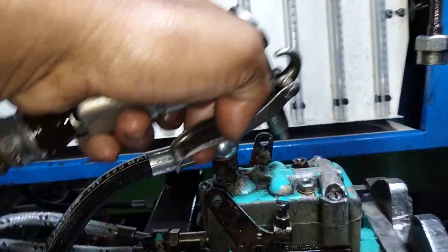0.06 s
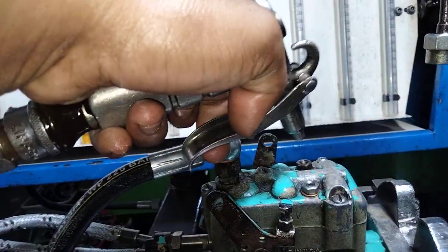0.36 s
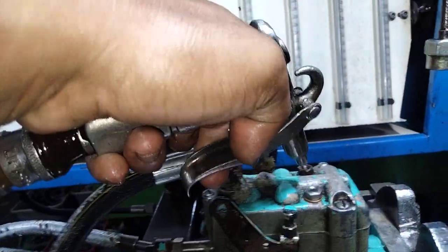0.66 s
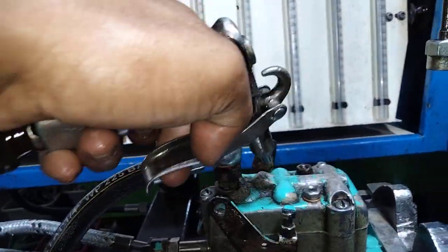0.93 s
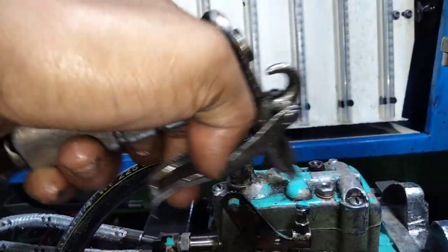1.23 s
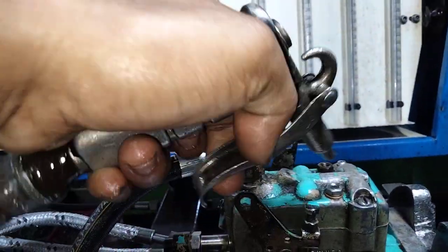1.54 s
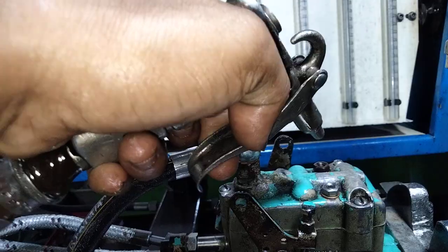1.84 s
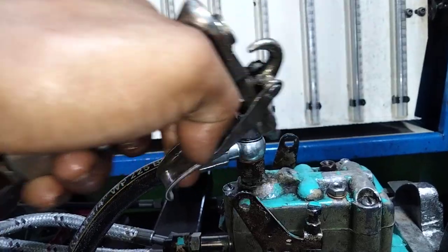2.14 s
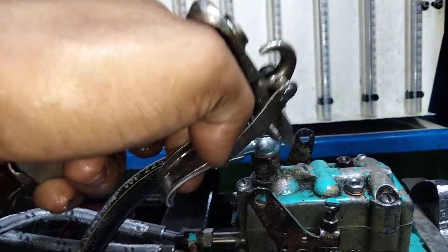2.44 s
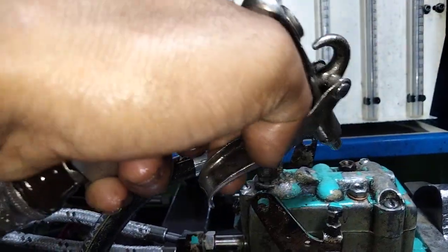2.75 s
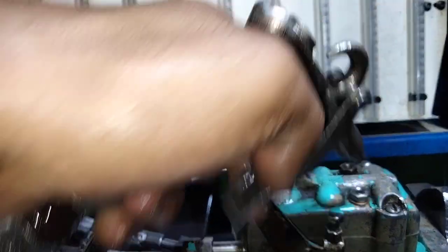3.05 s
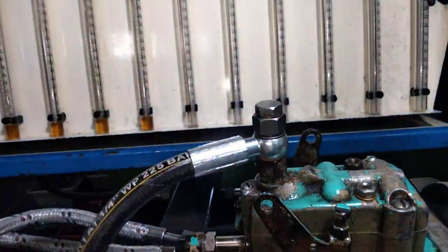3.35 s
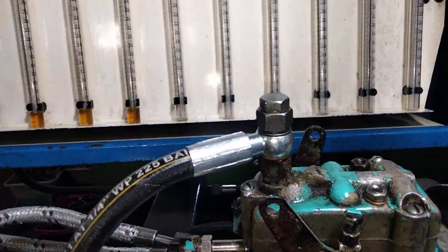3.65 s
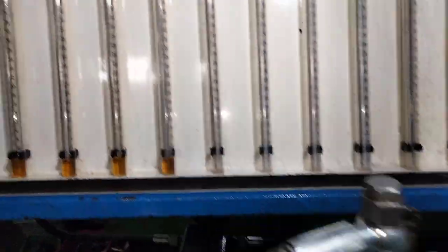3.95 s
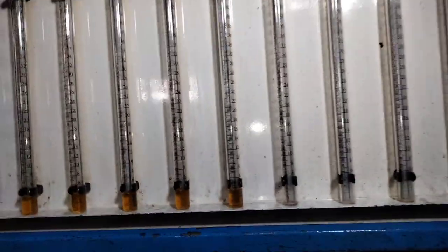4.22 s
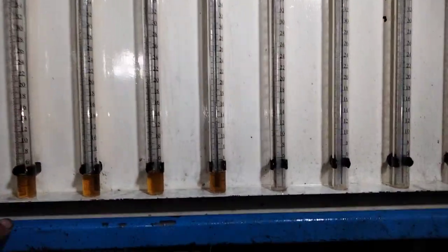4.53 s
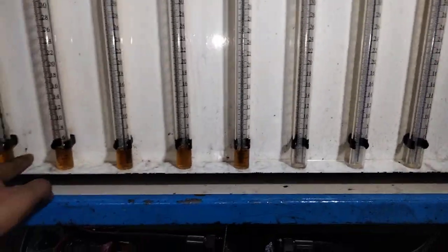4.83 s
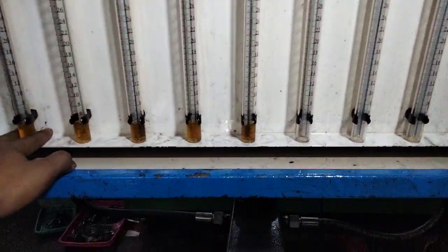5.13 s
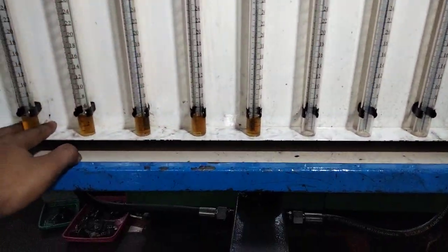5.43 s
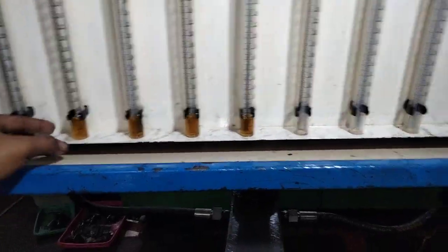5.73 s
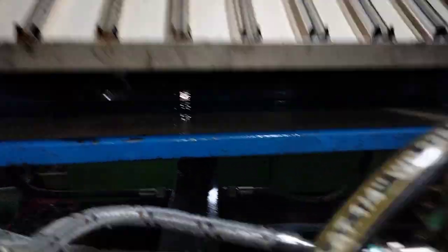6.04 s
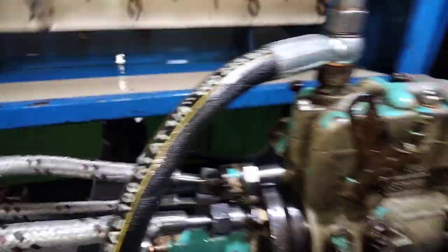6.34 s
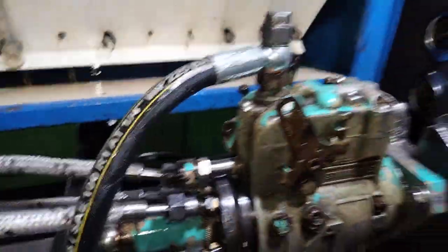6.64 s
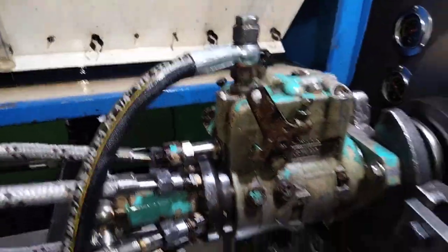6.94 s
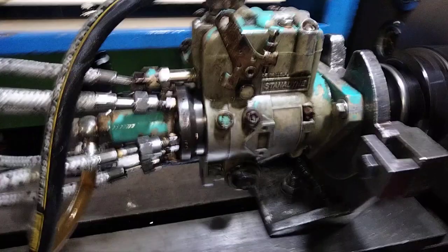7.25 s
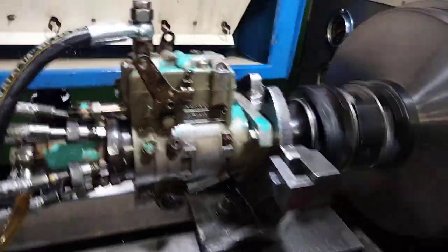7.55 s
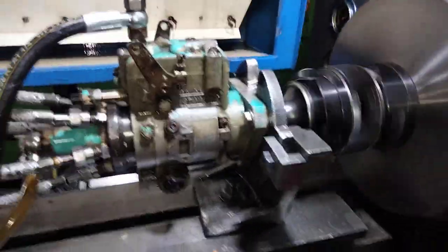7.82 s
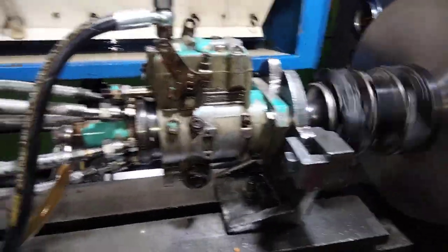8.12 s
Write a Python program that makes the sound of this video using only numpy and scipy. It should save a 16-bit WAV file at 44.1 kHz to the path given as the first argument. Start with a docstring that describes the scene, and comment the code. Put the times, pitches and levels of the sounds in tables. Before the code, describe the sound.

Close to the microphone in a workshop, a blow gun blasts compressed air for about three seconds, with one short pause, and dies in a wet sputter. A diesel injection pump running on a test bench comes forward, with rapid, uneven ticks, pipe pings and low knocks over a faint motor hum. A few tool clacks, a short whistling squirt and a metal clink follow, and the clatter changes tone near the end.

```python
"""In a workshop, a six-line diesel injection pump turns slowly on a test bench, close to a phone.
Each turn gives six uneven injector ticks, pings in the pipes, knocks in the pump and thuds in the frame.
For three seconds a blow gun blasts air over the pump, with one short pause, and dies in a wet sputter.
Later come a whistling squirt, tool knocks, a clinking lever and a droning panel. A motor hums below,
and the tone shifts as the phone moves from the bench's glass tubes to its drive."""
import sys
import numpy as np
from scipy import signal
from scipy.fft import rfft, irfft, next_fast_len
from scipy.io import wavfile
from scipy.ndimage import uniform_filter1d

SR = 44100
rng = np.random.default_rng(int(sys.argv[2]) if len(sys.argv) > 2 else 0)


def inscribe(sig):
    """Save sig as 16-bit PCM at rate SR to the path in sys.argv[1].

    A 1-D sig is mono; a 2-D sig holds one channel per row.
    Samples are clipped to [-1, 1] before scaling.
    """
    pcm = np.round(np.clip(np.atleast_2d(sig).T, -1, 1) * 32767)
    wavfile.write(sys.argv[1], SR, pcm.astype(np.int16))


N = 369558
T = np.arange(N) / SR

# how far the drive shaft has turned: (time [s], count [turns])
SHAFT_TURNS = [(0, 0.382), (3.6837, 22), (4.707, 28), (6.0686, 36), (6.5805, 39), (7.4346, 44),
               (8.4569, 50)]
# the six ticks of a turn, two of them double:
# (time in turn [s], chatter [dB], rise [s], decay [s], snap [dB], body knock [dB], pipe ring [dB])
STROKES = [(.0035, 0, 0.0044, 0.0063, -1.5, -4, 0.5), (0.0316, -2.5, 0.0045, 0.0087, -4.5, -3, -5.5),
           (0.0574, -6.5, 0.0018, 0.01, -4.5, -4.5, -10), (0.086, -6.5, 0.0024, 0.0068, -7.5, -4, -31),
           (0.0915, -4.5, 0.0019, 0.0076, -27, -4.5, -14.5), (0.1141, -2.5, .002, .005, -10.5, -1, -14),
           (0.142, -4.5, 0.0015, 0.0067, -4.5, -1, -10), (0.149, -2, 0.0017, 0.0034, -30, -2.5, -16)]
# tone of a tick's gritty chatter: (frequency [Hz], level [dB])
TICK_TONE = [(900, -18.5), (2000, -16), (3500, -10.5), (5000, -12.5), (7000, -11.5), (8200, -2), (9200, 4),
             (10500, -7.5), (13300, -14.5), (15300, -17.5)]
# tone of its bright snap: (frequency [Hz], level [dB])
SNAP_TONE = [(1500, -37), (3500, -20), (7000, -8.5), (9300, 4), (11000, -2.5), (13300, -8), (15300, -1)]
# tone of the injector nozzles ringing on: (frequency [Hz], level [dB])
RING_TONE = [(900, -25), (2800, -9), (6500, -15), (8200, 2), (9200, 8), (10500, -9), (13000, -23),
             (15300, -24)]
# loudness of the injector clatter: (time [s], level [dB])
CLATTER_LEVEL = [(3.9, -32), (5.9, -33), (6.5, -32), (7.25, -32), (7.65, -36.5)]
# tone of the pump body by the tubes: (frequency [Hz], level [dB])
BODY_BY_TUBES = [(35, -17), (70, -1), (130, 4), (220, 5), (320, -1), (420, -1.5), (700, -3), (950, -3),
                 (1170, -12), (1420, -7), (2200, -5.5), (5000, -10.5)]
# the same by the drive: (frequency [Hz], level [dB])
BODY_BY_DRIVE = [(35, -16), (70, -0.5), (130, -2.5), (220, 8), (340, -3), (440, 2.5), (580, -2), (780, -4),
                 (960, -14), (1100, -14.5), (2200, -14), (5000, -36)]
# notes of the housing and bench panel: (pitch [Hz], width [Hz], boost by tubes [dB], boost by drive [dB])
HOUSING_NOTES = [(987, 43.8, 2.5, 10), (1377, 71, 8.5, 6), (1820, 57, 0, 11.5)]
# notes of the steel pipes: (pitch [Hz], level by tubes [dB], level by drive [dB], time to fade 60 dB [s])
PIPE_NOTES = [(2543, 2, -21, 0.053), (2768, 4, -4, 0.088), (2970, -5, -14, 0.085), (3520, -6, 0, 0.07),
              (4130, -12, -14, 0.056), (5730, -40, -15, 0.051)]
# twisting jolts that shake the frame: (time in turn [s], level [dB])
JOLTS = [(0.014, -35), (.022, 5), (0.046, -12), (0.078, -17), (.113, -11), (0.14, 2.5), (0.146, -7)]
# how near the phone is to the pump, as loudness: (time [s], relative level [dB])
NEARNESS = [(4.0, -29.5), (4.22, -27.5), (4.7, -29.5), (5.42, -27.5), (5.9, -28.0), (6.3, -31.5),
            (6.58, -32.0), (7.0, -30), (7.6, -29.5), (8.15, -29.5)]
# where the phone is: (time [s], place [0 by the tubes, 1 by the drive])
PHONE_PLACE = [(5.9, 0.1), (6.4, 0.4), (7.2, 0.4), (7.5, 0.97)]
# brief dips in the machine's sound: (start [s], hold [s], depth [dB])
DIPS = [(2.279, 0.052, -6), (3.214, .06, -4), (3.43, 0.22, -5), (3.805, 0.071, -4.5), (4.942, 0.071, -15)]
# trigger pulls: (opens [s], shuts [s], hiss [dB], roar [dB], buffeting [dB], leak afterwards [dB])
BLASTS = [(-.05, 2.265, -19, -22, -27, -28.5), (2.384, 2.478, -23, -26.5, -33.5, -50),
          (2.477, 3.203, -18.5, -22, -26, -23.5)]
# tone of the air jet: (frequency [Hz], level [dB])
JET_TONE = [(15, -30), (25, 1), (165, 0.5), (219, -1), (297, 0.5), (694, 0), (1780, -1.5), (5280, -8.5),
            (7000, -13), (9100, -42), (15400, -120)]
# tone of the nozzle's hiss: (frequency [Hz], level [dB])
HISS_TONE = [(4000, -41), (6500, -15), (7600, -11), (8400, -3.5), (9100, -1), (9700, -3), (10400, -6.5),
             (11200, -7.5), (12300, -11), (13400, -13), (14500, -11.5), (15200, -7.5), (15600, -13)]
# how squarely the nozzle faces the phone: (time [s], relative hiss [dB])
GUN_AIM = [(0.0, -18), (0.69, -17.5), (0.71, -19.5), (1.35, -19), (1.37, -20), (1.61, -18), (1.86, -22.5),
           (2.05, -21), (2.14, -18.5), (2.24, -22), (2.51, -18.5), (2.618, -21.5), (2.836, -18.5),
           (3.038, -22.5), (3.18, -20)]
# air glancing off the pump onto the phone: (time [s], extra buffeting [dB])
AIR_SPILL = [(.4, 2), (1.2, -0.5), (1.68, 0.5), (1.74, 3.5), (2.25, 2.5), (2.5, 0.5), (3.12, 2), (3.19, 0)]
# the jet grazes an edge: (start [s], hold [s], level [dB], rise [s], decay [s])
GRAZES = [(.15, 0.055, -28, .11, 0.11), (1.17, 0.11, -28, 0.29, .1)]
# the thin whistle at that edge: (pitch [Hz], width [Hz], level [dB])
EDGE_NOTE = [(11750, 400, 0)]
# air fizzing through oil: (start [s], hold [s], level [dB], rise [s], decay [s])
FIZZES = [(3.329, 0.012, -21, 0.026, 0.023), (3.465, 0.093, -19, 0.056, 0.09)]
# tone of the fizz: (frequency [Hz], level [dB])
FIZZ_TONE = [(120, -5.5), (350, -1), (800, -13), (1500, -11), (2100, -13), (4200, -4.5), (6000, -9),
             (7500, -3.5), (9000, 0.5), (11000, -8.5), (13500, -11), (15300, -11)]
# notes in the fizz: (pitch [Hz], width [Hz], level [dB])
FIZZ_NOTES = [(2050, 50, -3), (2430, 22, -3.5), (2700, 70, -2), (3030, 90, -4), (3500, 59, -4),
              (3760, 65, -5), (4180, 89, -1), (4680, 80, -2.5)]
# notes of the whistling squirt: (pitch [Hz], width [Hz], level [dB])
SQUIRT_NOTES = [(3440, 1000, 0.5), (7000, 130, -2.5), (10820, 25, -4), (8800, 1700, -2)]
# tool and hand knocks: (time [s], clack [dB], clank [dB], thud [dB], decay [s])
KNOCKS = [(2.376, -18, -46, -42, .0015), (2.385, -16, -36, -35, .005), (3.315, -24, -45, -38, 0.0027),
          (3.335, -29, -42, -23.5, 0.012), (3.356, -29, -32, -32, .003), (3.52, -40, -32, -30.5, 0.062),
          (3.786, -15.5, -15.5, -43, .007), (3.804, -23, -22, -50, 0.021),
          (4.941, -16, -19.5, -19.5, 0.0031), (6.016, -25, -28, -25, 0.021), (7.439, -25, -23, -45, .007)]
# slow swings of air pressure at the phone: (start [s], level [dB], length [s])
PUFFS = [(2.237, -26.5, 0.075), (3.18, -31, 0.1), (3.363, -31, 0.13), (4.93, -40, 0.074)]
# notes of the steel lever: (pitch [Hz], width [Hz], level [dB])
LEVER_NOTES = [(2480, 330, -10), (4160, 300, -8), (5100, 350, -4.5), (7300, 250, -7), (9360, 350, 3.5),
               (10300, 250, -4), (11800, 600, -5)]
# notes of the loose panel: (pitch [Hz], width [Hz], level [dB])
PANEL_NOTES = [(420, 43, -1), (644, 15, -3.5), (950, 140, -3), (2520, 250, -6)]
# notes of the motor: (pitch [Hz], level by tubes [dB], level by drive [dB])
HUM_NOTES = [(70.4, -47, -62), (385.7, -44, -60), (424.4, -56, -48), (452, -47.5, -52), (498.5, -49, -56),
             (534, -54, -42.5)]
# tone of the workshop's steady noise: (frequency [Hz], level [dB])
ROOM_TONE = [(25, -16), (70, -13.5), (200, -5.5), (450, -2.5), (1000, -7), (2500, -14), (6500, -9.5),
             (9050, -10), (11000, -11), (13000, -24), (15300, -25)]

TURN_S = 6 / 35.21  # six ticks a turn, about 35 ticks a second
TICK_FOLLOW, RATTLE_FOLLOW, BODY_FOLLOW = 0.27, 1.7, 1.15  # dB gained per dB of nearness
ROAR_FOLLOW, ROAR_LOSS = 0.65, 0.64  # dB of roar gained per dB of aim, and lost per dB of spill


def pump(tick_db=-26.5, body_db=-37, rattle_db=-33, pipe_db=-6, frame_db=-39.5, accent_db=2):
    """Ticks, pings, knocks and thuds add up; their balance shifts as the phone moves."""
    near = around_average(NEARNESS)
    # by the drive, the first tick of each turn stands out
    first_tick = each_turn(turn_pulse(STROKES[0][0], 0, rise=0.0083, decay=0.0064))
    clatter, tick = split(injectors() * amp(by_place(0, accent_db) * first_tick), 6070)
    knock, rattle = split(pump_body(), 860)
    out = amp(tick_db + TICK_FOLLOW * near) * unit_level(tick)
    out += amp(curve(CLATTER_LEVEL)) * (unit_level(clatter) + amp(pipe_db) * pipes())
    out += amp(rattle_db + RATTLE_FOLLOW * near) * unit_level(rattle)
    out += amp(BODY_FOLLOW * near) * (amp(body_db) * unit_level(knock) + amp(frame_db) * frame())
    return out


def injectors(tail_db=-17, grit_db=1.5, uneven_db=1.0):
    """Each injector snaps open, chatters in a gritty burst and rings on faintly."""
    burst = combine(turn_pulse(s, db, rise, decay) for s, db, rise, decay, *_ in STROKES)
    tail = combine(turn_pulse(s, db + tail_db, rise, decay=0.036) for s, db, rise, *_ in STROKES)
    crack = sum(turn_pulse(s, db, rise=0.00028, decay=0.0034) for s, *_, db, _, _ in STROKES)
    chatter = colour(noise() * each_turn(burst) * amp(grit_db * drift(1500)), TICK_TONE)
    snaps = colour(noise() * each_turn(crack), SNAP_TONE)
    ringing = colour(noise() * each_turn(tail), RING_TONE)
    return unit_level((chatter + snaps + ringing) * amp(uneven_db * drift(50)))


def pump_body(rumble=0.59, alike_below_hz=1800):
    """The cam and plungers knock alike in every turn; only the rattle on top changes."""
    pushes = combine(turn_pulse(s, db, rise=0.002, decay=0.018) for s, *_, db, _ in STROKES)
    force = np.hypot(pushes, rumble)
    knocks = rng.standard_normal(len(force))
    for _ in range(3):  # sharp knocks are about equally strong at every pitch
        phases = np.angle(rfft(knocks * force))
        knocks = irfft(np.exp(1j * phases), len(force))
    low_rattle, high_rattle = split(unit_level(noise() * each_turn(force)), alike_below_hz)
    low_knocks, _ = split(unit_level(each_turn(knocks)), alike_below_hz)
    shake = low_knocks + 0.3 * low_rattle + high_rattle
    body = shake.copy()
    for hz, width, tubes_db, drive_db in HOUSING_NOTES:
        boost = by_place(amp(tubes_db), amp(drive_db)) - 1
        body += boost * band(shake, hz - width / 2, hz + width / 2, order=1)
    return by_place(colour(body, BODY_BY_TUBES), colour(body, BODY_BY_DRIVE))


def pipes(uneven_db=0.5, waver=0.86):
    """The steel pressure pipes ping after each stroke."""
    out = np.zeros(N)
    for hz, tubes_db, drive_db, fade_s in PIPE_NOTES:
        decay = fade_s / np.log(1000)
        ring = combine(turn_pulse(s, db, rise=0.00032, decay=decay) for s, *_, db in STROKES)
        level = amp(by_place(tubes_db, drive_db) + uneven_db * drift(30))
        out += level * each_turn(ring) * np.sin(2 * np.pi * hz * T + waver * drift(90))
    return unit_level(out)


def frame(rough_hz=232.1, waver=0.63):
    """Twisting jolts make the bench frame boom, with a whole number of swings per turn."""
    boom = combine(turn_pulse(s, db, rise=0.008, decay=0.0083) for s, db in JOLTS)
    phase = 2 * np.pi * round(rough_hz * TURN_S) * curve(SHAFT_TURNS)
    return unit_level(each_turn(boom) * np.sin(phase + waver * drift(40)))


def blow_gun(valve_s=0.0051, flutter_db=0.5, gust_db=1.0, crackle_db=0.76):
    """The nozzle hisses, the jet roars on the pump and stray air buffets the phone; the shut valve leaks."""
    aim, spill = around_average(GUN_AIM), curve(AIR_SPILL)
    low, high = split(colour(noise(), JET_TONE), 840)
    nozzle = unit_level(colour(noise(), HISS_TONE))
    hiss = nozzle * amp(aim)
    roar = unit_level(high) * amp(ROAR_FOLLOW * aim - ROAR_LOSS * spill + crackle_db * drift(500))
    buffet = unit_level(low * amp(gust_db * drift(60))) * amp(spill)
    out = np.zeros(N)
    for opens, shuts, hiss_db, roar_db, buffet_db, leak_db in BLASTS:
        valve = np.clip(np.minimum(T - opens, shuts - T) / valve_s + 0.5, 0, 1)
        out += valve * (amp(hiss_db) * hiss + amp(roar_db) * roar + amp(buffet_db) * buffet)
        out += amp(leak_db) * nozzle * pulse(T - shuts, valve_s, decay=0.088)
    return reflections(out * amp(flutter_db * drift(39.54)))


def reflections(jet, depth_db=0.7):
    """Echoes off the hand and pump lift and lower patches of the jet's tone as the gun moves."""
    spectrum = signal.stft(jet, nperseg=512)[2]
    patches = uniform_filter1d(rng.standard_normal(spectrum.shape), 3, axis=0)  # smooth over pitch
    patches = uniform_filter1d(patches, 26, axis=1)  # and over time
    return signal.istft(spectrum * amp(depth_db * unit_level(patches)), nperseg=512)[1][:N]


def edge_whistle():
    """The jet whistles thinly where it grazes an edge."""
    return sum(swell(*row) for row in GRAZES) * noisy_notes(EDGE_NOTE)


def sputter(ring_db=-4, spit_db=2):
    """Leaking air fizzes through oil, and later squirts once with a whistle."""
    fizz = unit_level(colour(noise(), FIZZ_TONE)) + amp(ring_db) * noisy_notes(FIZZ_NOTES)
    fizz = unit_level(fizz * amp(spit_db * drift(400)))
    squirt = swell(start=4.571, hold=0.018, db=-20, rise=0.004, decay=0.073) * noisy_notes(SQUIRT_NOTES)
    return sum(swell(*row) for row in FIZZES) * fizz + squirt


def handling(rise=0.00066):
    """Tools and hands make metal clacks and dull thuds; slow puffs of air reach the phone."""
    clack = unit_level(colour(noise(), TICK_TONE))
    clank = unit_level(band(noise(), 520, 2900))
    thud = unit_level(band(noise(), 116, 220))
    out = np.zeros(N)
    for s, clack_db, clank_db, thud_db, decay in KNOCKS:
        out += (amp(clack_db) * clack + amp(clank_db) * clank) * pulse(T - s, rise, decay)
        out += amp(thud_db) * thud * pulse(T - s - decay / 2, 2 * rise, decay)
    for s, db, length in PUFFS:
        progress = np.clip((T - s) / length, 0, 1)
        out += amp(db) * np.sin(np.pi * progress) * np.sin(4 * np.pi * progress)
    return out


def lever(knock_s=4.94, db=-20.5):
    """A steel lever is knocked once and rings."""
    return amp(db) * pulse(T - knock_s, rise=0.0005, decay=0.045) * noisy_notes(LEVER_NOTES)


def panel():
    """A loose panel drones briefly."""
    return swell(start=7.41, hold=0.13, db=-34, rise=0.012, decay=0.022) * noisy_notes(PANEL_NOTES)


def motor():
    """The drive motor hums on a few slightly wavering notes."""
    out = np.zeros(N)
    for hz, tubes_db, drive_db in HUM_NOTES:
        note = unit_level(np.sin(2 * np.pi * hz * T + 0.2 * drift(4.7)))
        out += amp(by_place(tubes_db, drive_db)) * note
    return out


def workshop(db=-39):
    """The room adds a steady wash of noise."""
    return amp(db) * unit_level(colour(noise(), ROOM_TONE))


def machine_dips(blowing_db=-9, fall_s=0.0065, recover_s=0.013):
    """The machine sounds quieter while the gun blows, and dips briefly at other times."""
    dip_db = sum(db * held(s, hold, fall_s, recover_s) for s, hold, db in DIPS)
    blasts = [held(opens, shuts - opens, fall_s, recover_s) for opens, shuts, *_ in BLASTS]
    return amp(dip_db + blowing_db * np.max(blasts, axis=0))


def by_place(tubes, drive):
    """Blends what is heard by the tubes with what is heard by the drive."""
    place = curve(PHONE_PLACE)
    return (1 - place) * tubes + place * drive


def each_turn(pattern):
    """Repeats one turn's pattern in step with the shaft."""
    return np.interp(curve(SHAFT_TURNS) % 1, np.arange(len(pattern)) / len(pattern), pattern, period=1)


def turn_pulse(peak_s, db, rise, decay):
    """One turn's pattern, holding a single pulse."""
    lead_s = TURN_S / 10  # room for the rise
    age = (np.arange(int(TURN_S * SR)) / SR - peak_s + lead_s) % TURN_S - lead_s
    return amp(db) * pulse(age, rise, decay)


def pulse(age, rise, decay):
    """Swells up to 1 at age 0, then dies away; times are in seconds."""
    return np.exp(np.minimum(age, 0) / rise - np.maximum(age, 0) / decay)


def held(start, hold, rise, decay):
    """Rises to 1 at start, holds, then dies away."""
    return pulse(T - np.clip(T, start, start + hold), rise, decay)


def swell(start, hold, db, rise, decay):
    """A held pulse at a level in dB."""
    return amp(db) * held(start, hold, rise, decay)


def combine(pulses):
    """Adds pulses by their energy."""
    return np.sqrt(sum(p ** 2 for p in pulses))


def noisy_notes(rows):
    """Noise rings at each row's pitch; a narrower width gives a purer note."""
    out = np.zeros(N)
    for hz, width, db in rows:
        pole = np.exp((-np.pi * width + 2j * np.pi * hz) / SR)
        out += amp(db) * unit_level(signal.lfilter([1], [1, -pole], noise()).real)
    return unit_level(out)


def noise():
    """White noise: an even hiss."""
    return rng.standard_normal(N)


def drift(per_s):
    """A random wander that changes course per_s times a second."""
    points = rng.standard_normal(40000)
    return unit_level(np.interp(T * per_s, np.arange(len(points)), points))


def colour(x, tone):
    """Makes each frequency louder or softer, following a tone table."""
    hz, db = np.transpose(tone)
    size = next_fast_len(len(x) + 4096)
    log_hz = np.log(np.fft.rfftfreq(size, 1 / SR) + 1)
    gain = amp(np.interp(log_hz, np.log(hz), db))
    return irfft(rfft(x, size) * gain, size)[:len(x)]


def band(x, low_hz, high_hz, order=2):
    """Keeps the part between two frequencies."""
    return signal.sosfilt(signal.butter(order, [low_hz, high_hz], "band", fs=SR, output="sos"), x)


def split(x, hz):
    """The parts below and above hz."""
    low = signal.sosfiltfilt(signal.butter(3, hz, fs=SR, output="sos"), x)
    return low, x - low


def curve(rows):
    """Joins (time, value) points with straight lines."""
    return np.interp(T, *np.transpose(rows))


def around_average(rows):
    """How far a curve lies above or below the average of its points."""
    return curve(rows) - np.mean(np.asarray(rows)[:, 1])


def amp(db):
    """Turns decibels into a multiplier."""
    return 10 ** (np.asarray(db) / 20)


def unit_level(x):
    """Scales a signal to an average strength (rms) of 1."""
    return x / np.sqrt(np.mean(x ** 2) + 1e-20)


def scene():
    """All sources are close and reach both channels alike."""
    mono = (pump() + motor()) * machine_dips() + workshop()
    mono += blow_gun() + edge_whistle() + sputter()
    mono += handling() + lever() + panel()
    return np.array([mono, mono])


def record(dry, ceiling=0.68, top_hz=15620):
    """Rounds off the loudest peaks, then cuts the highest treble."""
    rounded = dry / (1 + (dry / ceiling) ** 4) ** (1 / 4)
    treble_cut = signal.firwin(701, top_hz, window=("kaiser", 8), fs=SR)
    return signal.oaconvolve(rounded, treble_cut[None], "same")


dry = scene()
out = record(dry)
inscribe(out)
```